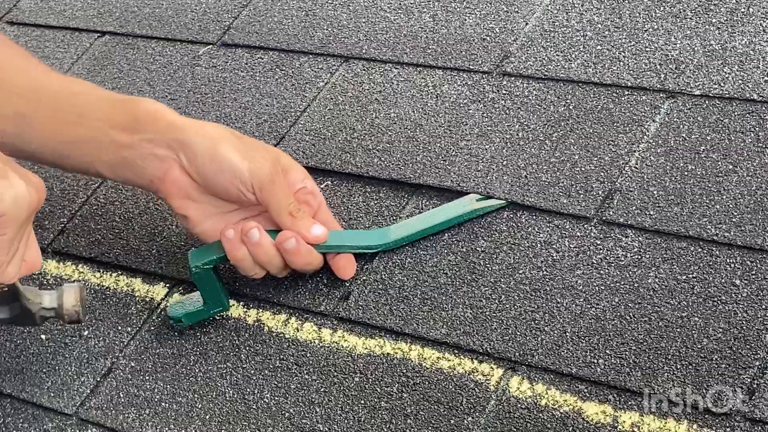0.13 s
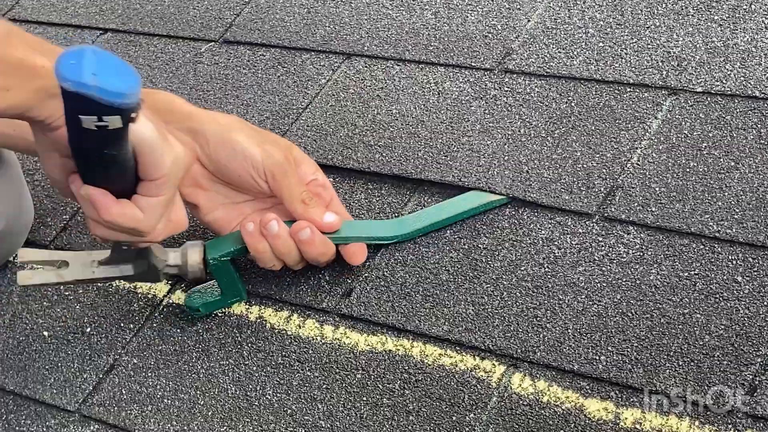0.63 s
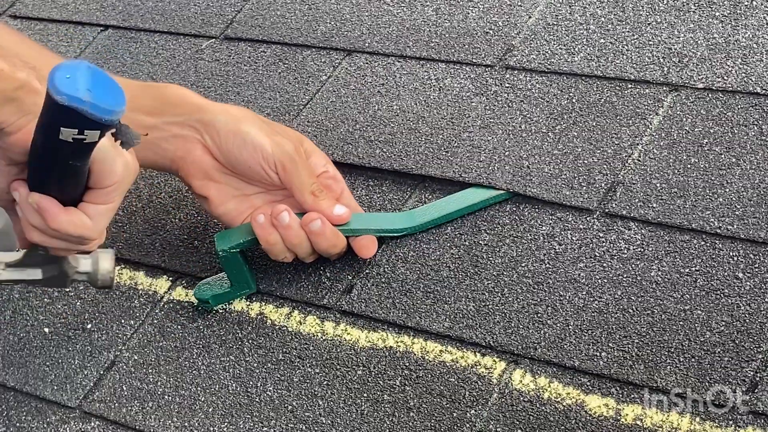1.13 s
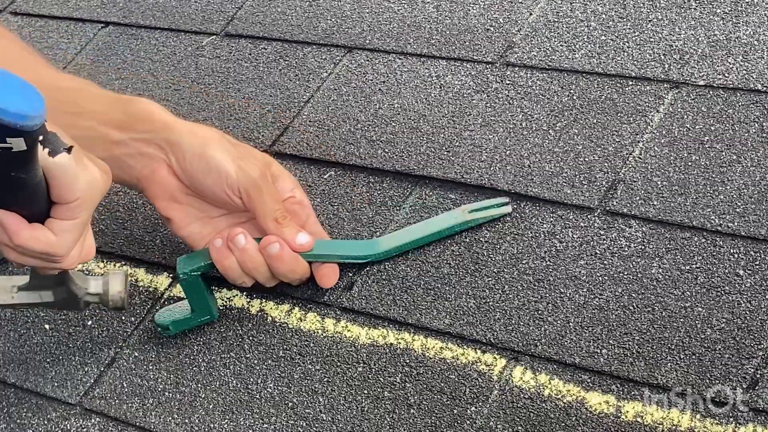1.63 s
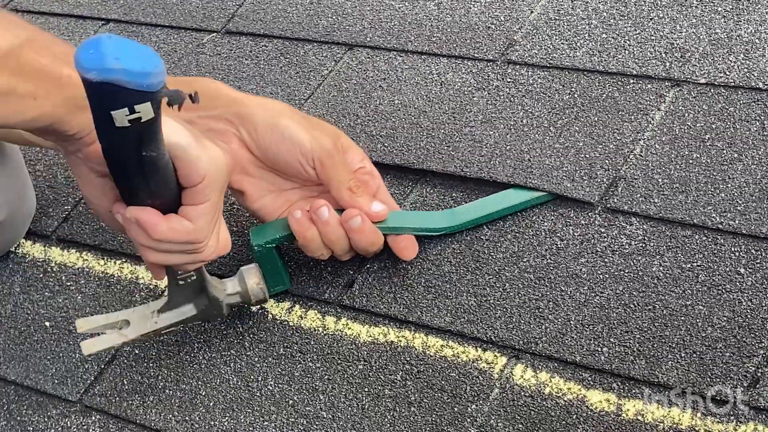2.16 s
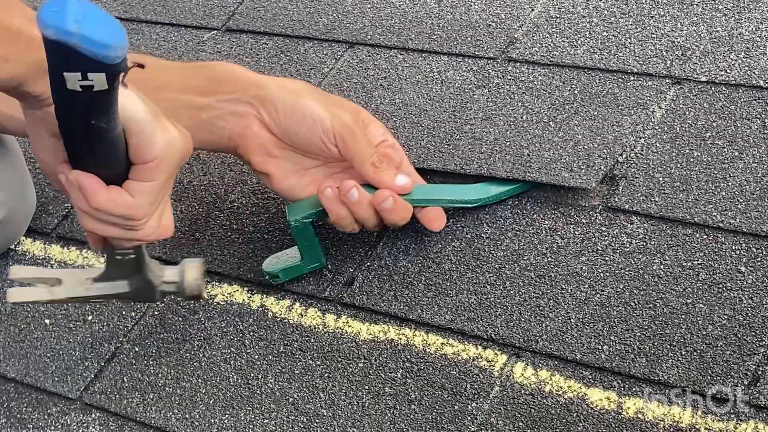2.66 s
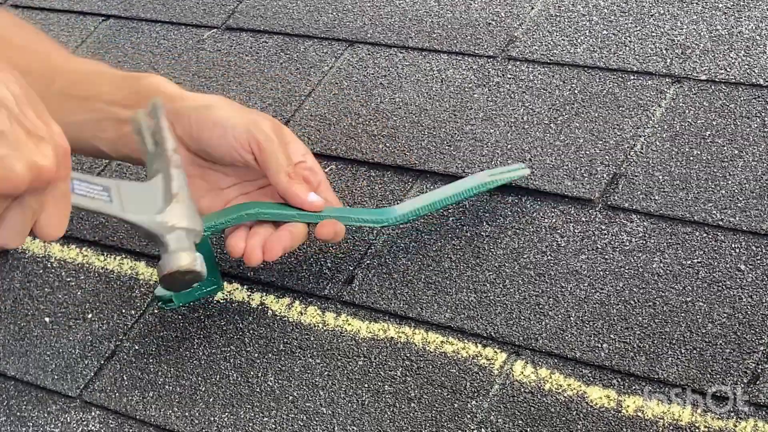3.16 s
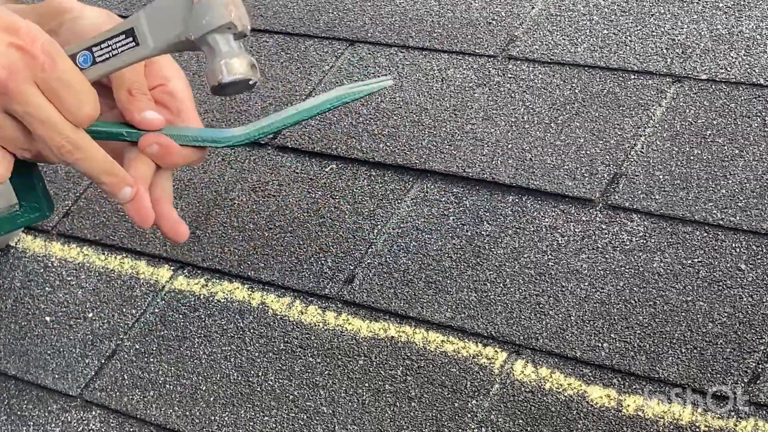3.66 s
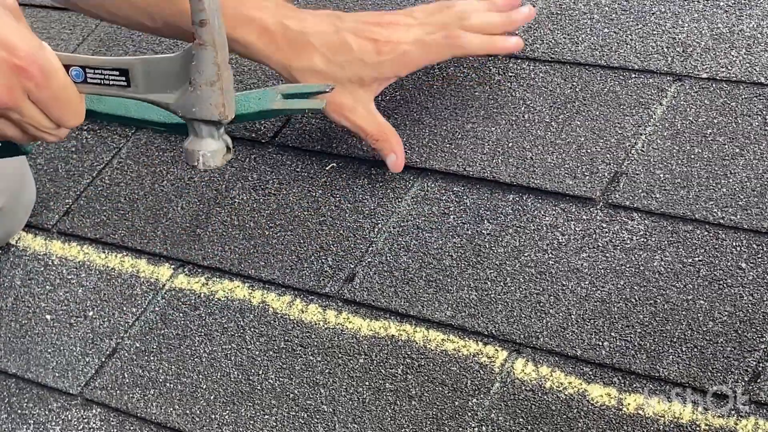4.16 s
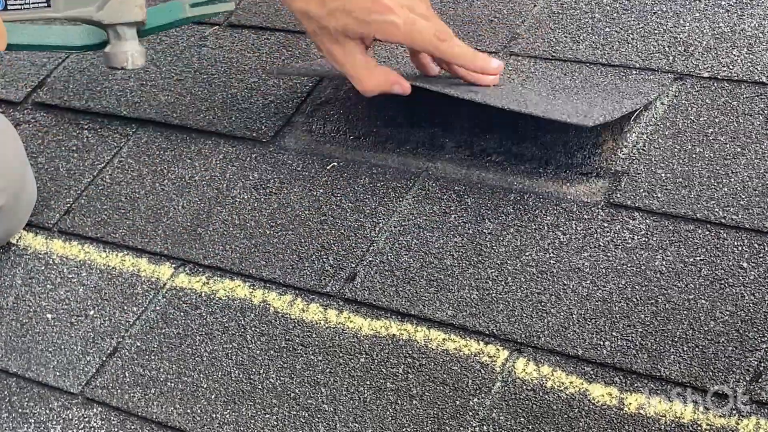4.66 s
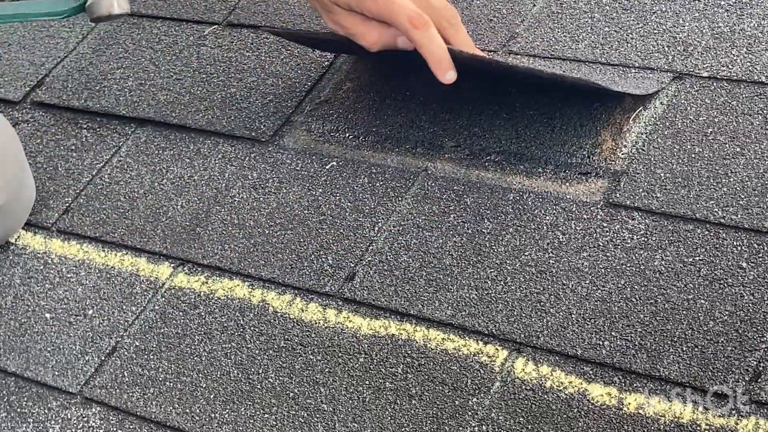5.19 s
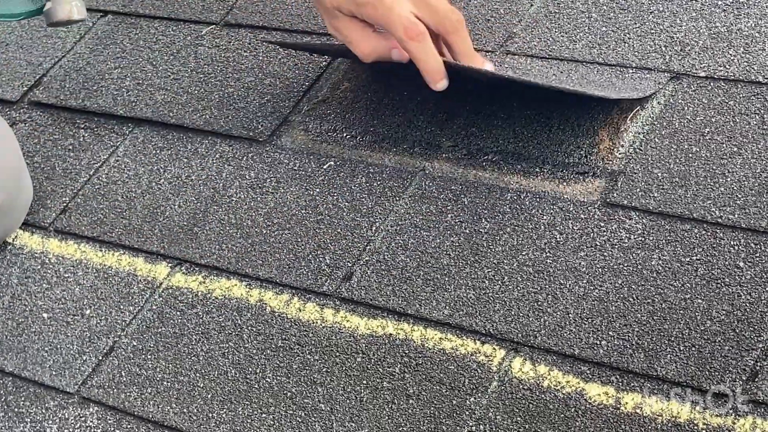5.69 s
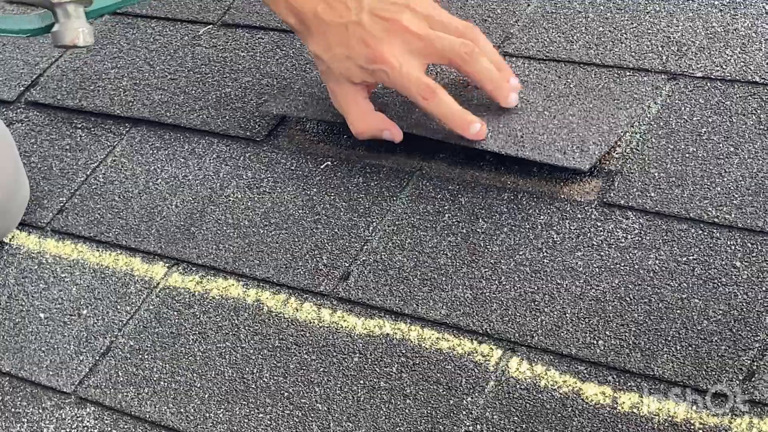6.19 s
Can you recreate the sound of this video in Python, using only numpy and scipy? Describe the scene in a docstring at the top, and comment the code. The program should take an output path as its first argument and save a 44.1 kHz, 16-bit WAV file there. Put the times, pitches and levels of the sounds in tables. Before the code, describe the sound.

Sharp steel-on-steel strikes, tightly damped by hand and shingle, land with small bouncing rebounds and a woody roof thud. Between the first four and the last pair the bar drags over gritty granules with snapping ticks. Afterwards it is mostly quiet: a light tap rings clear, a softer one is stilled, with faint rustles and grit. Open air, faint echoes from houses, soft distant engine and rumble, recorded close.

```python
"""Hammer on a pry bar

A hammer drives a hand-held steel pry bar under roof shingles, outdoors: short rings of steel with rebounds,
each with a roof knock and a burst of crushed grit. The bar drags over the grit, heard as dense tiny clicks;
two light touches of the tools let the bar ring freely. Behind them are single ticks, swells of high rustle,
a far engine made of sines, town rumble made of coloured noise, and faint echoes from houses.
The recorder turns itself down when peaks are loud, then climbs back."""
import sys
import numpy as np
from scipy import signal
from scipy.fft import rfft, irfft, next_fast_len
from scipy.io import wavfile

SR = 44100
rng = np.random.default_rng(int(sys.argv[2]) if len(sys.argv) > 2 else 0)


def waveform_to_disk(signal):
    """Save audio, clipped to [-1, 1], as 16-bit WAV at the path in sys.argv[1]."""
    frames = np.transpose(np.atleast_2d(signal))
    scaled = np.clip(frames, -1, 1) * 32767
    samples = np.round(scaled).astype(np.int16)
    wavfile.write(sys.argv[1], SR, samples)


def voltage_ratio(level):
    """Linear amplitude factor for a level in decibels (scalar or array-like)."""
    return 10 ** (np.asarray(level, float) / 20)


N = 278712  # length in samples


def rms_one(x):
    """Scale a sound to an rms level of 1."""
    return x / np.sqrt(np.mean(x ** 2) + 1e-20)


def at_hz(points, hz):
    """Read a table of values by pitch, on a log-frequency axis."""
    table_hz, value = np.transpose(points)
    return np.interp(np.log(np.maximum(hz, 1)), np.log(table_hz), value)


def coloured(x, spectrum):
    """Give a sound the colour of a spectrum by filtering it in the frequency domain."""
    length = x.shape[-1]
    size = next_fast_len(length)
    gain = voltage_ratio(at_hz(spectrum, np.fft.rfftfreq(size, 1 / SR)))
    return irfft(rfft(x, size) * gain, size)[..., :length]


def drift(rate_hz):
    """Slow random wandering of rms 1: smoothed noise, computed at every 40th sample."""
    r = np.exp(-80 * np.pi * rate_hz / SR)
    noise = rng.standard_normal(N // 40 + 2002)
    slow = signal.lfilter([1], [1, -2 * r, r * r], noise)[2000:]  # skip the filter's start
    return np.interp(np.arange(N) / 40, np.arange(len(slow)), rms_one(slow))


def add(out, start_s, sound):
    """Mix a sound in at a given time."""
    i = round(start_s * SR)
    out[i:i + len(sound)] += sound[:N - i]


def rings(hz, level_db, t60_s, rise_s, hold_s=0):
    """Ringing modes: sines that swell during contact, hold, then lose 60 dB in t60_s."""
    t = np.arange(SR // 2)[:, None] / SR
    fall_db = 60 * np.maximum(t - hold_s, 0) / t60_s
    modes = voltage_ratio(level_db - fall_db) * np.sin(2 * np.pi * hz * t)
    return (1 - np.exp(-t[:, 0] / rise_s)) * np.sum(modes, axis=1)


# how alike town noise is in the two microphone ports: pitch_hz, likeness (0 to 1)
PORT_LIKENESS = [(60, 0.91), (130, .94), (290, 0.87), (640, .26), (1410, 0.066), (2100, 0.28), (3300, 0.88),
                 (5500, 0.94), (9000, 0.36), (15000, .8)]
# colour of the town noise: pitch_hz, relative level_db per Hz
RUMBLE_COLOUR = [(25, -22.5), (45, -3.5), (114, -2.5), (154, -7), (220, -10), (350, -21), (690, -27),
                 (1300, -35.5), (2000, -40.5), (2500, -38.5), (3300, -47), (7250, -55.5), (7550, -42.5),
                 (7850, -59.5), (11500, -53), (16500, -67.5)]


def rumble():
    """Town noise, less alike in the two ports where it comes from all around."""
    mid, side = rfft(rng.standard_normal((2, N)))
    hz = np.fft.rfftfreq(N, 1 / SR)
    alike = np.clip(at_hz(PORT_LIKENESS, hz), 0, 1)
    both = np.sqrt(1 + alike) * mid + np.sqrt(1 - alike) * side * [[1], [-1]]
    noise = irfft(both * voltage_ratio(at_hz(RUMBLE_COLOUR, hz)), N)
    return voltage_ratio(-52 + 1.7 * drift(2.7)) * rms_one(noise)


# hum of the engine: multiple of the turning rate, level_db (the whole hum is then cut by 0.5 dB)
ENGINE_ORDERS = [(2, -60), (3, -60), (4, -54), (5, -60), (6, -64), (7, -61), (8, -62), (12, -69), (14, -74),
                 (16, -75)]


def engine():
    """Low multiples of a far engine's wavering speed; each swells and fades on its way through the air."""
    turns = np.cumsum(26.86 * (1 + 0.015 * drift(0.67))) / SR  # about 26.86 turns a second
    hum = 0
    for multiple, db in ENGINE_ORDERS:
        swell = voltage_ratio(db + 2.2 * drift(2.1))
        hum = hum + swell * np.sin(2 * np.pi * (multiple * turns + rng.random()))
    return voltage_ratio(-0.5) * hum


# soft swells, perhaps skin and sleeves moving: start_s, length_s, level_db
RUSTLE_SWELLS = [(1.001, 0.38, -74.5), (2.702, 0.37, -75), (3.15, 0.57, -82), (4.2, 0.46, -80),
                 (4.9, 0.24, -85.5), (5.88, 0.3, -81.5)]
# colour of the rustle: pitch_hz, relative level_db per Hz
RUSTLE_COLOUR = [(7500, -31), (9000, -9), (11500, 2), (13000, -6), (15000, -9), (16500, -30.5)]


def rustle():
    """Fine high hiss that swells and fades, with quick random wavering."""
    t = np.arange(N) / SR
    swell = 0
    for start_s, length_s, db in RUSTLE_SWELLS:
        arch = np.sin(np.pi * np.clip((t - start_s) / length_s, 0, 1))
        swell = swell + voltage_ratio(db) * arch ** 0.91
    return swell * voltage_ratio(2.5 * drift(30)) * rms_one(coloured(rng.standard_normal(N), RUSTLE_COLOUR))


def echoes(x):
    """A scattered tail from the houses around, with one nearer wall standing out."""
    wall_s, wall_db = 0.115, -49
    t = np.arange(SR) / SR
    lumps = voltage_ratio(3.5 * drift(45)[:SR])
    fade = voltage_ratio(-73.0 - 60 * t / 1.2) * np.clip((t - .06) / 0.04, 0, 1)  # silent for 60 ms, then fades in
    answer = rng.standard_normal((2, SR)) * lumps * fade
    answer[:, round(wall_s * SR)] += voltage_ratio(wall_db)
    band = signal.butter(2, [1800, 7000], "band", fs=SR, output="sos")
    return signal.fftconvolve(signal.sosfilt(band, x)[None], answer, axes=1)[:, :N]


# single granules snapping and knocks of the bar on the shingle: start_s, rough peak level_db, centre pitch_hz
TICKS = [(0.2183, -51, 6300), (1.5213, -50, 3320), (1.5697, -42, 4360), (1.6199, -32.5, 4100),
         (1.6531, -33.5, 6800), (1.681, -38, 3010), (1.6897, -37, 7000), (1.762, -46, 2500),
         (1.7728, -31.5, 6190), (2.3127, -37.5, 1500), (2.398, -49, 8770), (2.578, -43.5, 1200),
         (2.823, -40.5, 1210), (2.9106, -51.5, 5200), (3.0865, -52, 6860), (3.095, -50.5, 7300),
         (3.1225, -44.5, 702), (3.497, -50, 6310), (3.8024, -48, 8030), (3.856, -37, 890),
         (4.36, -50, 3670), (4.778, -51.5, 7520), (5.353, -52, 8000)]


def ticks():
    """Short noise snaps, each in its own pitch band, and fainter high ones at random times."""
    spread = 2.2  # band edges lie this factor below and above the centre
    out, t = np.zeros(N), np.arange(SR // 50) / SR
    noise = rng.standard_normal((len(TICKS), len(t)))
    for (start_s, db, hz), hiss in zip(TICKS, noise):
        edges_hz = [hz / spread, min(hz * spread, .4 * SR)]
        snap = signal.sosfilt(signal.butter(2, edges_hz, "band", fs=SR, output="sos"), hiss)
        add(out, start_s, voltage_ratio(db - 5 - 60 * t / .012) * rms_one(snap))
    sizes = voltage_ratio(-62.5 + 1.9 * np.minimum(rng.exponential(1, N), 3))
    faint = (rng.random(N) < 30 / SR) * sizes  # about 30 a second
    dying = signal.lfilter([1], [1, -.93], faint) * rng.standard_normal(N)
    return out + signal.sosfilt(signal.butter(2, 3500, "high", fs=SR, output="sos"), dying)


# ringing modes of the steel bar:
# pitch_hz, relative level_db struck on the end, relative level_db struck on the side, free t60_s
BAR = [(868, -27.5, -12, .05), (1975, -33, -5, 0.19), (2333, -22, -2.5, .32), (2790, -17.5, -28, .025),
       (3250, -3, -14, .14), (3404, -20.5, -12, 0.19), (3670, -22, -23.5, .03), (4660, -25.5, 3, .22),
       (5085, -17, -1.5, .09), (5270, -14, -30.5, .05), (6470, -20.5, -4.5, .08), (6923, -25.5, -28, 0.11),
       (7690, -26.5, -4.5, 0.062), (9200, -24.5, -13, 0.025), (11180, -25, -40, 0.012),
       (14276, -36, -40, .012)]
# pressure of bar or fingers dragging over grit, one list per drag: time_s, level_db
DRAGS = [
    [(1.516, -63), (1.57, -60), (1.626, -49.5), (1.64, -62), (1.69, -61.5), (1.75, -56.5), (1.775, -47),
     (1.8, -55.5), (1.845, -58), (1.862, -80.5)],
    [(2.68, -79), (2.788, -65), (2.82, -56), (2.85, -73), (3.2, -79.5)],
    [(4.29, -85), (4.32, -76.5), (4.37, -67), (4.46, -83)],
]
# colour of the dragged grit: pitch_hz, relative level_db per Hz
GRIT_COLOUR = [(240, -65), (400, -11), (666, -2.5), (1200, -8.5), (2220, -8.5), (3640, -11.5), (6640, -10),
               (8900, -17.5), (11200, -16.5), (16000, -33.5)]


def drags():
    """Dense clumped clicks of granules, coloured by the shingle and faintly answered by the held bar."""
    bar_t60_s, bar_db = .03, -7.5
    sizes = voltage_ratio(3.8 * np.minimum(rng.exponential(1, N), 4)) * rng.choice([-1, 1], N)
    clicks_per_s = 3500 * voltage_ratio(5 * drift(80))
    grains = sizes * (rng.random(N) < clicks_per_s / SR)
    t = np.arange(N) / SR
    effort = 0
    for rows in DRAGS:
        during = (t >= rows[0][0]) & (t < rows[-1][0])
        effort = effort + np.where(during, voltage_ratio(np.interp(t, *np.transpose(rows))), 0)
    sung = 0
    r = voltage_ratio(-60 / (bar_t60_s * SR))  # loss per sample
    for hz, end_db, _, _ in BAR:
        w = 2 * np.pi * hz / SR
        mode = signal.lfilter([0, np.sin(w)], [1, -2 * r * np.cos(w), r * r], grains + 1e-18)
        sung = sung + voltage_ratio(.4 * end_db) * mode
    return effort * (rms_one(coloured(grains, GRIT_COLOUR)) + voltage_ratio(bar_db) * rms_one(sung))


# tools touch side on, bar free to ring:
# start_s, level_db, level change_db per octave away from the second mode, hammer ring level_db re the touch
CLINKS = [(3.8561, -35, 0, -20), (4.0133, -47, -36, -50)]
# ringing modes of the ungripped hammer head: pitch_hz, relative level_db, t60_s
HAMMER = [(6060, -5, .13), (7945, -14, .11), (11530, 2.5, .065)]
# colour of steel cracks and crushed grit: pitch_hz, relative level_db per Hz
CRUNCH_COLOUR = [(200, -38), (500, -13.5), (1500, -16), (2600, -7.5), (3400, -2), (5200, -6), (7000, -17.5),
                 (9000, -16.5), (11000, -20.5), (16000, -33)]


def clinks():
    """Light side touches: a short crack and free ringing until a hand closes on the bar and stills it."""
    grasp_s, grasp_t60_s = 4.06, 0.086
    out, t = np.zeros(N), np.arange(SR // 20) / SR
    hz, _, side_db, free_s = np.transpose(BAR)
    for start_s, db, soft_db, ring_db in CLINKS:
        modes_db = side_db + soft_db * np.abs(np.log2(hz / hz[1]))
        add(out, start_s, voltage_ratio(db) * rings(hz, modes_db, free_s, rise_s=.0001))
        add(out, start_s, voltage_ratio(db + ring_db) * rings(*np.transpose(HAMMER), rise_s=0.00021))
        crack = rms_one(coloured(rng.standard_normal(len(t)), CRUNCH_COLOUR))
        add(out, start_s, voltage_ratio(db + 4 + .7 * soft_db - 60 * t / .012) * crack)
    return out * voltage_ratio(-60 * np.maximum(np.arange(N) / SR - grasp_s, 0) / grasp_t60_s)


# steel meets steel at the bar's end, blows and their rebounds:
# start_s, rough peak level_db, loudest mode pitch_hz, t60_s allowed by grip and shingle, rafter thump_db re peak
BLOWS = [(0.3555, -3, 3330, 0.014, -37.5), (0.3629, -11.5, 3430, .014, -39.5),
         (0.6497, -3.5, 3380, 0.012, -37.5), (0.6557, -15.5, 3400, 0.027, -40),
         (0.9701, -3, 3340, 0.012, -28.5), (0.9744, -14.5, 3380, 0.015, -40),
         (1.272, -3.5, 3278, 0.012, -32), (1.2799, -15.5, 3197, 0.011, -41),
         (2.122, -4.5, 3180, 0.0073, -34), (2.152, -2.5, 3350, 0.016, -26), (2.1611, -19, 3370, .022, -48),
         (2.4917, -5, 3340, 0.0071, -30.5), (2.5076, -1.5, 3330, 0.018, -16),
         (2.5145, -12.5, 3340, 0.099, -29), (2.5404, -17, 3340, 0.17, -41), (2.794, -45, 3120, 0.016, -40),
         (2.8053, -38.5, 3340, 0.24, -40)]
# ringing modes of the roof boards: typical pitch_hz, relative level_db, t60_s
DECK = [(108, 3.5, 0.05), (169, 0.5, 0.055), (330, -6, 0.044), (623, -6, .03), (730, -4, 0.024),
        (950, -5, .025), (1530, -11, 0.019)]


def blows():
    """Bar modes choked by the grip, free hammer ring, deck knock and thump, a burst of crushed grit."""
    firm_grip_s = 0.014  # t60 above which the bar counts as loose
    out, t = np.zeros(N), np.arange(SR // 8) / SR
    hz, end_db, _, free_s = np.transpose(BAR)
    head_hz, head_db, head_t60_s = np.transpose(HAMMER)
    deck_hz, deck_db, deck_t60_s = np.transpose(DECK)
    chance = rng.normal(0, 1, (len(BLOWS), 49))
    noise = rng.standard_normal((len(BLOWS), len(t)))
    for (start_s, db, loud_hz, grip_s, thump_db), luck, hiss in zip(BLOWS, chance, noise):
        grip_s = np.clip(grip_s, .004, .3)
        looser = max(np.log2(grip_s / firm_grip_s), 0)  # doublings of the t60
        # a loose bar passes less to the roof
        knock_db = -22 - 6 * looser
        crunch_db = -13 - 5 * looser
        ring_db = -30.5 + 2.5 * looser + 0.98 * max(db, -15.5)  # follows the blow, down to a light touch

        choked_s = 1 / (1 / free_s + 1 / grip_s)  # losses add
        slide_s = min(.11 * grip_s, .004)  # the bar flies forward ringing before it jams
        bar_hz = hz * (1 + .0004 / grip_s * luck[16:32])  # pressing on the shingle detunes the bar
        bar_hz[4], luck[4] = loud_hz, 0  # the loudest mode has a set pitch and no random level
        others_db = -1.5 * np.log2(grip_s / .015) * (hz != hz[4])  # a looser bar favours its loudest mode
        bar_db = end_db + 2 + others_db + 3 * luck[:16]
        add(out, start_s, voltage_ratio(db) * rings(bar_hz, bar_db, choked_s, rise_s=.0003, hold_s=slide_s))

        head = rings(head_hz, head_db + 4 * luck[32:35], head_t60_s, rise_s=0.00045)
        add(out, start_s, voltage_ratio(db + ring_db) * head)

        boards_hz = deck_hz * (1 + .07 * luck[35:42])  # each blow loads another spot of the roof
        boards = rings(boards_hz, deck_db + 1.7 * luck[42:], deck_t60_s, rise_s=0.0028)
        add(out, start_s + 0.0019, voltage_ratio(db + knock_db) * boards)
        rafter = rings(62, 0, .1, rise_s=0.0013)  # the deep thump
        add(out, start_s + 0.0013, voltage_ratio(db + thump_db) * rafter)

        burst = voltage_ratio(-60 * t / .012) + voltage_ratio(-8 - 60 * t / .033)  # crack, then grit settling
        add(out, start_s, voltage_ratio(db + crunch_db) * rms_one(coloured(hiss, CRUNCH_COLOUR)) * burst)
    return out


def scene():
    """Tools close by, with echoes and background around them."""
    steel = blows() + clinks()
    return steel + drags() + ticks() + rustle() + echoes(steel) + rumble() + engine()


def gain_control(x):
    """Gain falls when peaks pass -24 dB, then climbs back at up to 45 dB a second, smoothed over 58 ms."""
    climb_db = 45 * np.arange(N) / SR
    peak_db = 20 * np.log10(np.abs(x).max(axis=0) + 1e-9)
    over_db = 0.32 * np.maximum(peak_db + 24, 0)
    held_db = np.maximum.accumulate(over_db + climb_db) - climb_db
    r = np.exp(-1 / (0.058 * SR))
    return x * voltage_ratio(-signal.lfilter([1 - r], [1, -r], held_db))


# how far the left microphone port leads the right: pitch_hz, phase_radians
PORT_PHASE = [(0, 0), (690, .2), (1050, .8), (1460, 1.0), (1900, 0.0), (3100, 0.5), (3960, 0.1),
              (4900, .25), (5600, -.3), (7150, 0.2), (8700, -2.7), (9650, -4.0), (10600, -5.6),
              (13900, -10.3), (14600, -11.7), (15500, -12.8), (16600, -12.5)]
# how much louder the left port is than the right: pitch_hz, difference_db
PORT_BALANCE = [(60, 0.9), (110, 0.9), (200, 1.5), (380, 1.5), (700, 1.0), (1290, 2.0), (2380, -0.5),
                (4400, 0.0), (8120, -1.2), (15000, -0.8)]


def ports_hear(dry):
    """Two ports that differ in phase and level by pitch; each takes half of the difference."""
    size = next_fast_len(N)
    hz = np.fft.rfftfreq(size, 1 / SR)
    phase = np.exp(.5j * np.interp(hz, *np.transpose(PORT_PHASE)))
    half = phase * voltage_ratio(.5 * at_hz(PORT_BALANCE, hz))
    ports = irfft(rfft(dry, size) * [half, 1 / half], size)[:, :N]
    ports = signal.sosfilt(signal.butter(2, 45, "high", fs=SR, output="sos"), ports)  # microphone bass cut
    return signal.sosfilt(signal.butter(4, 15500, fs=SR, output="sos"), ports)  # and treble roll-off


def low_pass(x):
    """Removes everything above the highest recorded frequency."""
    return signal.sosfilt(signal.butter(12, 17050, fs=SR, output="sos"), x)


def record(dry):
    """The recorder: two microphone ports, gain control and a soft ceiling on loud peaks."""
    levelled = gain_control(ports_hear(dry))
    mix = 1.327 * np.tanh(levelled / 1.272)
    return low_pass(mix)


dry = scene()
out = record(dry)
waveform_to_disk(out)
```